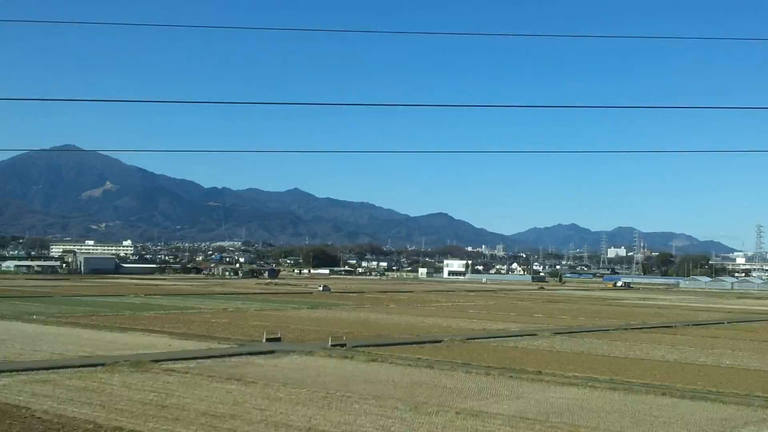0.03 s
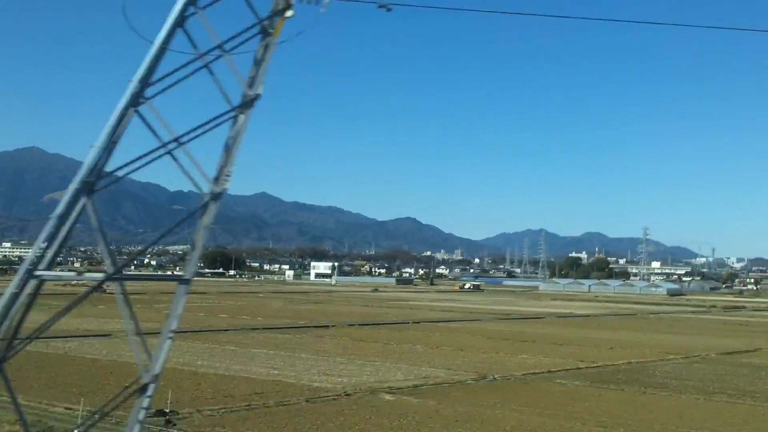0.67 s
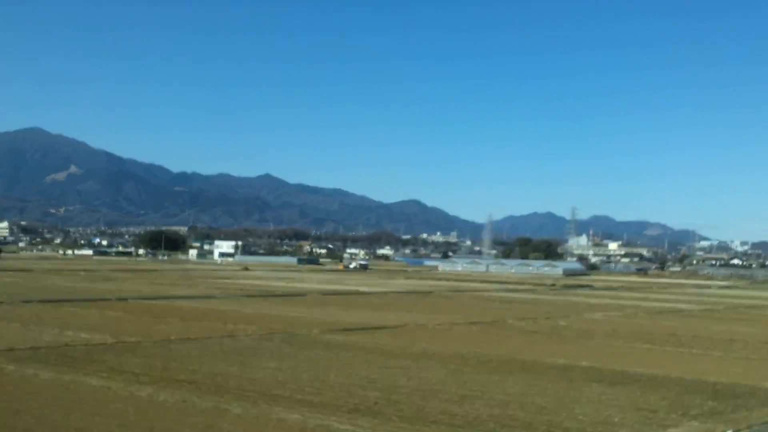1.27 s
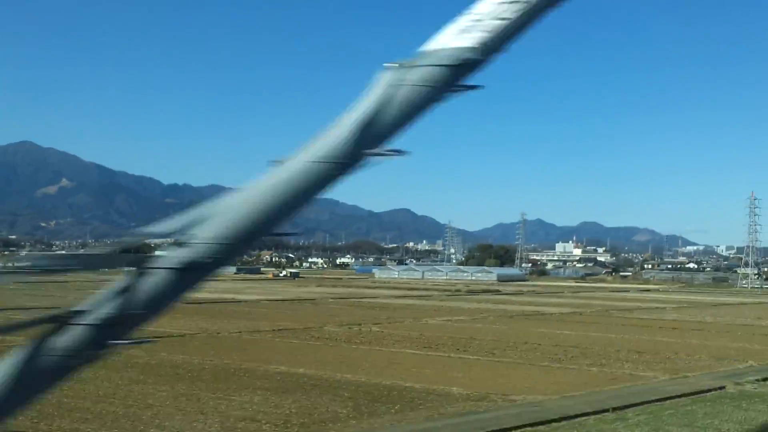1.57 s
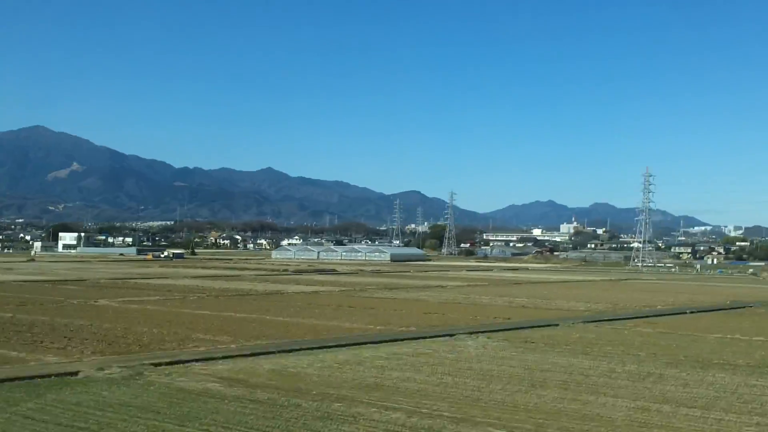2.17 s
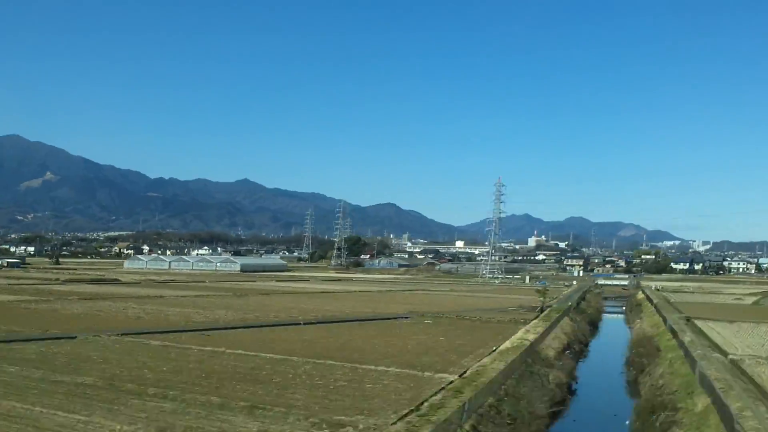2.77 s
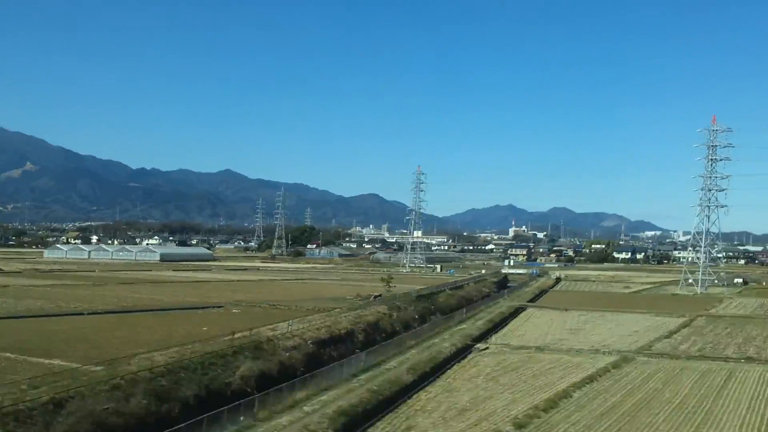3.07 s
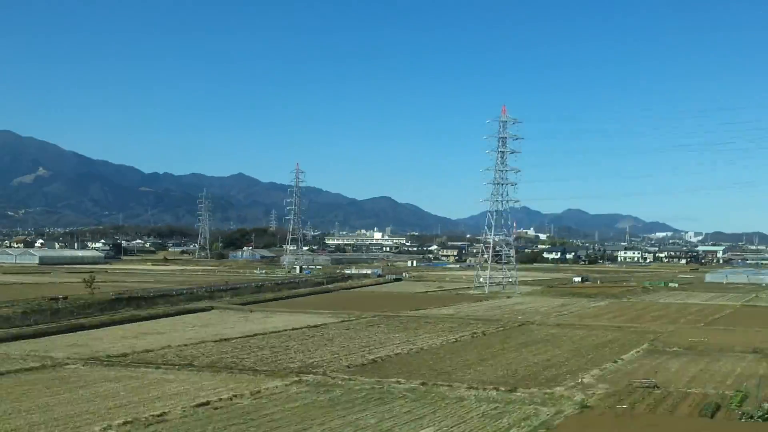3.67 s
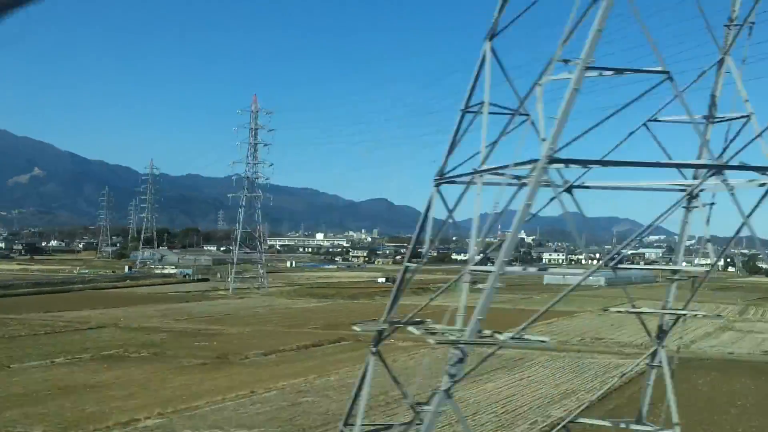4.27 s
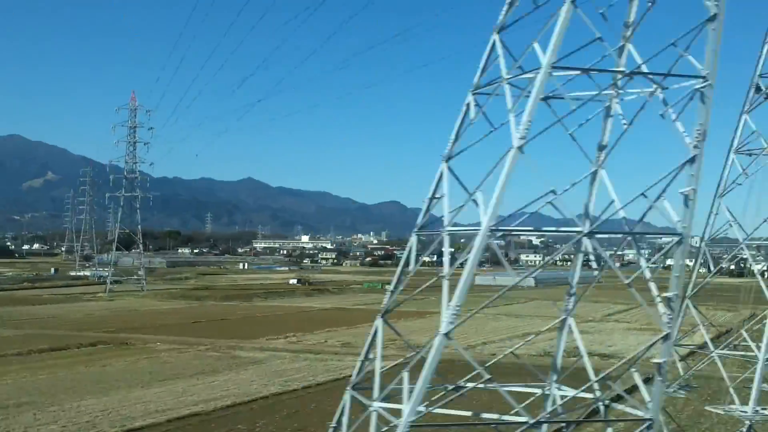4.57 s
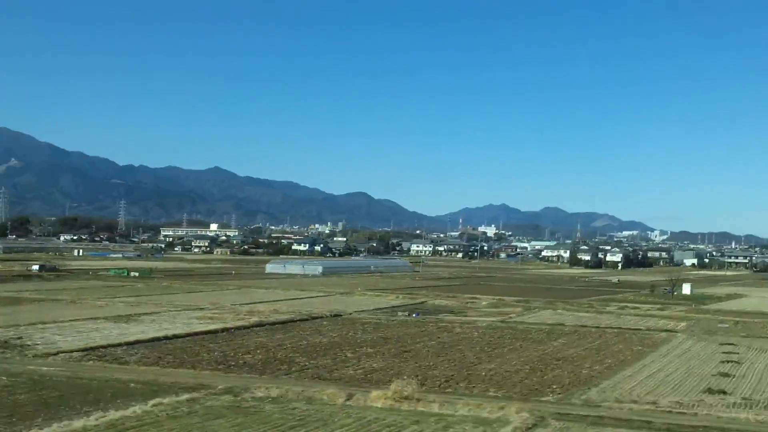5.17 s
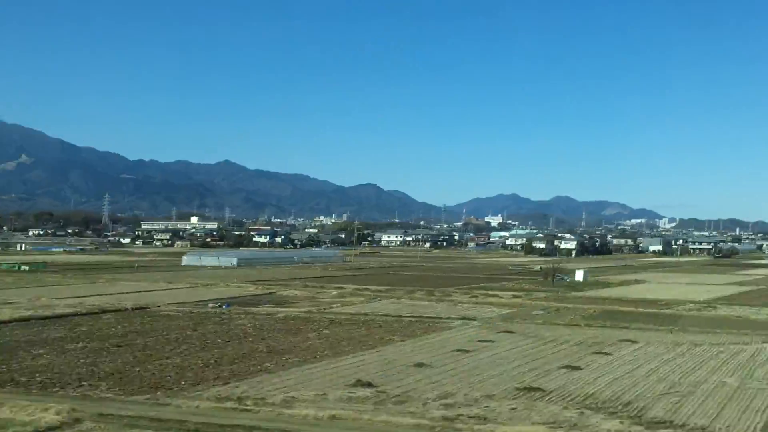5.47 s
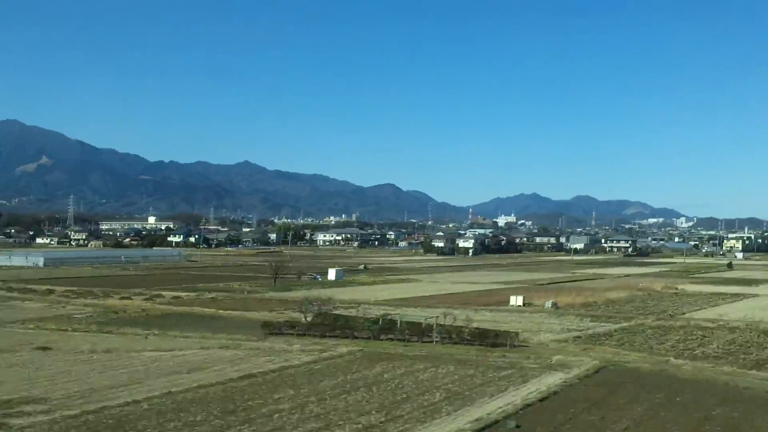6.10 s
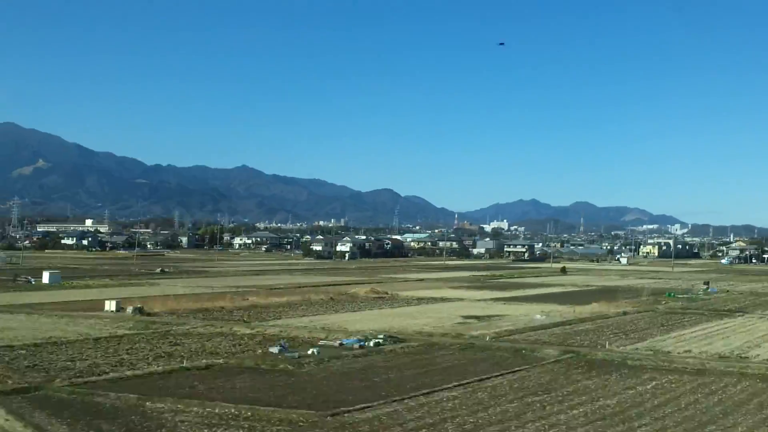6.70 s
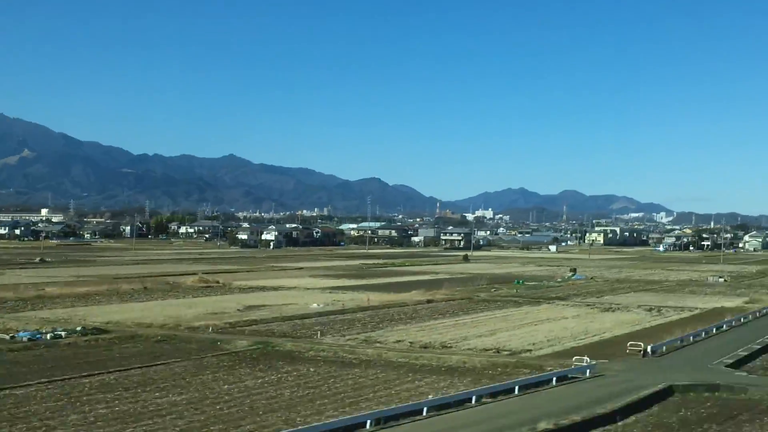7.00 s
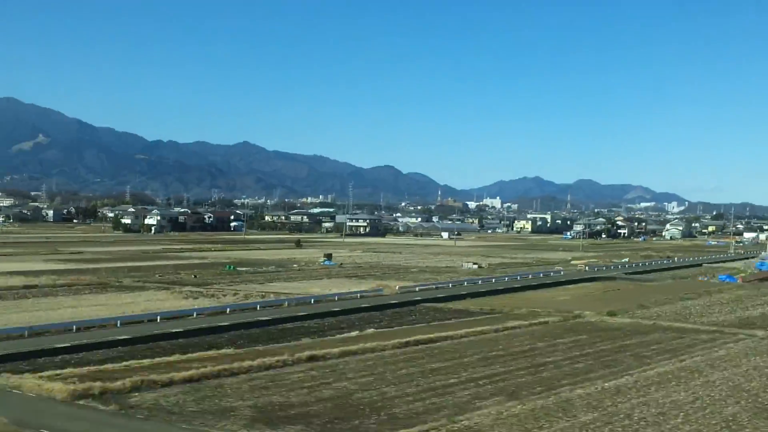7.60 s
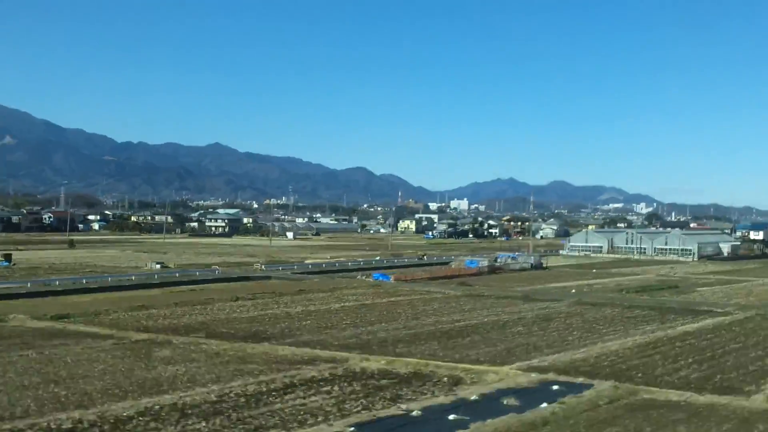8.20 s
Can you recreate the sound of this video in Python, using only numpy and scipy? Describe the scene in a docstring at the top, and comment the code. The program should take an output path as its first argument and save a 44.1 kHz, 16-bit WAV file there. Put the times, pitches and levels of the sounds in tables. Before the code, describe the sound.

A high-speed train cruises, heard from the cabin: deep droning rumble, faint rushing air and high metallic wheel ringing that swells and fades.

```python
"""High-speed train, window seat

At a steady cruise, rolling noise booms in the cabin's resonances and slightly out-of-round wheels
drone on multiples of their turn rate. Rough rail makes the wheels sing in swells, squeal and rasp.
Behind that the drive whines faintly, air rushes along the car and things by the track whoosh past."""
import sys
import numpy as np
from scipy import signal
from scipy.fft import rfft, irfft
from scipy.io import wavfile
from scipy.ndimage import uniform_filter1d, minimum_filter1d

SR = 44100
rng = np.random.default_rng(int(sys.argv[2]) if len(sys.argv) > 2 else 0)


def materialize(psi):
    """Save the field psi as 16-bit PCM at rate SR to the path in sys.argv[1].

    A 1-D psi becomes a single channel; in a 2-D psi each row is a channel.
    """
    bounded = np.clip(np.atleast_2d(psi).T, -1, 1)
    quanta = np.round(bounded * 32767).astype(np.int16)
    wavfile.write(sys.argv[1], SR, quanta)


N = 372640
TIME = np.arange(N) / SR
FREQ = np.maximum(np.arange(N // 2 + 1) * SR / N, 1)


def undb(db):
    """Decibels to gain."""
    return 10 ** (np.asarray(db) / 20)


def unit(x):
    """Scale to an rms of one."""
    return x / np.sqrt(np.mean(np.abs(x) ** 2))


def curve(table):
    """Glide through a table's points in time, one value per sample."""
    return np.interp(TIME, *np.transpose(table))


def across(table, hz):
    """Read a table on a log-frequency axis."""
    points, values = np.transpose(table)
    return np.interp(np.log(hz), np.log(points), values)


def swell(start, length, attack_s, release_s):
    """An envelope from 0 to 1: it rises at the start and falls back once its length is over."""
    rise = (TIME - start) / attack_s
    fall = 1 - (TIME - start - length) / release_s
    return np.clip(np.minimum(rise, fall), 0, 1)


def lifts(table, attack_s, release_s):
    """A level ride in dB, one swell per row."""
    return sum(db * swell(start, length, attack_s, release_s) for start, length, db in table)


def bursts(table, attack_s, release_s):
    """A gain that opens from silence, one swell per row."""
    return sum(undb(db) * swell(start, length, attack_s, release_s) for start, length, db in table)


def wander(rate_hz):
    """Smooth random motion, complex, with an rms of one."""
    lowpass = np.exp(-.5 * (FREQ / rate_hz) ** 2)
    real, imag = irfft(rfft(rng.standard_normal((2, N))) * lowpass, N)
    return unit(real + 1j * imag)


# Stereo balance. Each row: frequency in Hz, left minus right in dB.
BALANCE = [(60, 7), (190, 4), (330, 2), (700, 2), (1100, 0.5), (1600, 0.2), (2200, 5), (4500, 4.5),
           (6000, 4), (8000, 1.5), (10000, -7.5)]
def sides(hz):
    """Left and right gains: the window side, left, is louder in all but the highest treble."""
    return undb(np.array([[.5], [-.5]]) * across(BALANCE, hz))


# How alike the two sides sound. Each row: frequency in Hz, correlation.
LIKENESS = [(130, .985), (255, .98), (325, .66), (390, .88), (680, .76), (930, .5), (1100, .25),
            (1600, .55), (2100, .2), (3100, .2), (4100, .2), (5500, .08)]
# Treble arrives from one side and reaches the left later. Each row: frequency in Hz, lag in seconds.
LEFT_LAG = [(900, 0), (1300, .00036)]
def noise(colour, resonances=()):
    """Diffuse noise at unit rms, lifted at its resonances: narrow in the bass, wide in the treble."""
    octaves_outside = np.abs(np.log2(FREQ / np.clip(FREQ, colour[0][0], colour[-1][0])))
    db = across(colour, FREQ) - 20 * octaves_outside
    for hz, width, lift_db in resonances:
        db = db + lift_db / (1 + (2 * (FREQ - hz) / width) ** 2)
    alike = across(LIKENESS, FREQ)
    mid, side = rfft(rng.standard_normal((2, N))) * np.sqrt([1 + alike, 1 - alike])
    lag_rad = 0.19 + 2 * np.pi * FREQ * across(LEFT_LAG, FREQ)
    pair = np.array([(mid + side) * np.exp(-1j * lag_rad), mid - side])
    return unit(irfft(pair * sides(FREQ) * undb(db), N))


def tone(hz, unsteady, flutter_hz):
    """A tone whose level and phase flutter; high tones reach each side by different paths."""
    hz = hz * np.ones(N)
    alike = across(LIKENESS, hz.mean())
    per_side = np.array([wander(flutter_hz), wander(flutter_hz)])
    flutter = np.sqrt(alike) * wander(flutter_hz) + np.sqrt(1 - alike) * per_side
    amplitude = np.sqrt(1 - unsteady ** 2) + unsteady * flutter
    lag_rad = np.array([[0.36 + (1 - alike) * np.pi / 2], [0]])
    phase = 2 * np.pi * (np.cumsum(hz) / SR + rng.random()) - lag_rad
    return np.sqrt(2) * np.real(amplitude * np.exp(1j * phase)) * sides(hz.mean())


# Pitches of the fans and the drive, in Hz.
DRIVE_HZ = [71.5, 131, 2135, 2318, 2361.5, 7494]
# Their mix, pitch by pitch. Each row: opening level in dB, closing level in dB, unsteadiness 0-1.
DRIVE_MIX = [(-47.5, -50, 0.4), (-33, -41, 0.51), (-52.5, -50.5, 0.1), (-39.5, -54, 0.9),
             (-44.5, -42, 0.02), (-57.5, -52.5, 0.9)]
def drive():
    """Fans hum and the gears and motors whine at constant speed, slowly trading strength."""
    return sum(undb(np.linspace(start_db, end_db, N)) * tone(hz, unsteady, flutter_hz=4.5)
               for hz, (start_db, end_db, unsteady) in zip(DRIVE_HZ, DRIVE_MIX))


# The swish's narrow colour. Each row: frequency in Hz, relative level in dB.
SWISH_COLOUR = [(2200, -22), (2900, 4), (3200, -6), (4000, -25)]
def swish():
    """A brief thin hiss as the car passes a mast."""
    envelope = swell(start=4.25, length=0.08, attack_s=0.059, release_s=0.14)
    return noise(SWISH_COLOUR) * undb(-36) * envelope


# The whooshes' hollow colour. Each row: frequency in Hz, relative level in dB.
WHOOSH_COLOUR = [(350, -16), (500, -7), (680, 3), (850, -9), (1200, -22), (2000, -40)]
# Close pass-bys. Each row: start in seconds, length in seconds, level in dB.
WHOOSHES = [(2.5, 0.059, -24), (4.302, 0.073, -24), (4.697, 0.11, -28), (5.66, 0.13, -24),
            (5.98, 0.13, -23)]
def whooshes():
    """Things close to the track throw the train's roar back at the window."""
    return noise(WHOOSH_COLOUR) * bursts(WHOOSHES, attack_s=0.033, release_s=0.065)


# The body of the wind and its fine hiss. Each row: frequency in Hz, relative level in dB.
WIND_COLOUR = [(350, -7), (550, -1.5), (700, 2), (900, 2), (1100, 1.3), (1400, -3), (1750, -8.5),
               (2300, -19.5), (3500, -34.5)]
HISS_COLOUR = [(1500, -11), (3000, 4.5), (4500, 3), (5700, 0), (6200, 3), (6500, 5), (7500, 5), (8500, 1),
               (9300, -6), (10000, -21), (11000, -32.5)]
# Air rushes up at things by the track. Each row: start in seconds, length in seconds, lift in dB.
RUSHES = [(.04, 0.085, 2), (2.03, 0.11, 4), (4.69, 0.16, 3.5), (5.97, 0.14, 4)]
def air():
    """Wind on the skin of the car builds a little and rushes up now and then, over a flickering hiss."""
    wind_db = -24.5 + 0.24 * (TIME - TIME.mean())
    wind = noise(WIND_COLOUR) * undb(wind_db + lifts(RUSHES, attack_s=0.059, release_s=0.14))
    hiss = noise(HISS_COLOUR) * undb(-39 + 0.82 * wander(6.9).real)
    return wind + hiss


# Rail roughness, as the rolling noise it excites. Each row: time in seconds, level in dB.
RAIL = [(0.1, -33), (0.52, -31), (0.68, -34), (0.97, -29.5), (1.1, -32.5), (1.45, -28.5), (1.75, -30),
        (2.0, -29), (2.47, -30), (2.6, -30), (3.05, -31.5), (3.24, -29), (3.43, -31), (3.51, -29.5),
        (4.02, -31.5), (4.42, -30), (4.57, -32.5), (4.8, -30), (5.05, -32.5), (5.5, -29), (5.78, -29),
        (5.83, -30), (5.97, -29.5), (6.05, -29.5), (6.28, -29.5), (6.42, -34.5), (6.56, -29.5), (7.13, -31),
        (7.26, -32.5), (7.55, -29.5), (8.07, -28), (8.38, -30.5)]
def roughness(slope):
    """Lift in dB for a layer that gains `slope` dB for each dB the rail is rougher than usual."""
    usual_db = -31
    return slope * (curve(RAIL) - usual_db)


# Rolling noise and its upper sheen. Each row: frequency in Hz, relative level in dB.
ROLLING_COLOUR = [(1300, -29), (1750, -9.5), (1950, -1.5), (2100, -1.5), (2280, -0.5), (2450, -2),
                  (2650, -4), (2900, -7.5), (3400, -13.5), (4500, -33)]
SHEEN_COLOUR = [(2700, -18.5), (3400, -5), (3800, 0), (4400, -1), (4900, -3), (5500, -10), (7000, -24.5)]
# Wheel resonances in both. Each row: frequency in Hz, width in Hz, lift in dB.
WHEEL_RESONANCES = [(2148, 66, 5.5), (2296, 19, 7.5), (4340, 45, 1.5)]
# Scrapes that bring up the sheen. Each row: start in seconds, length in seconds, lift in dB.
SCRAPES = [(1.8, 0.67, 1.5), (3.12, 0.4, 3.5), (6.25, .35, 2.5), (7.9, .2, 0.5)]
def rolling():
    """Steel on steel: wheels and rail radiate noise that follows the roughness and brightens in scrapes."""
    body = noise(ROLLING_COLOUR, WHEEL_RESONANCES) * undb(-30 + roughness(slope=1.1))
    sheen_db = -39.5 + roughness(slope=0.46) + lifts(SCRAPES, attack_s=0.092, release_s=0.092)
    return body + noise(SHEEN_COLOUR, WHEEL_RESONANCES) * undb(sheen_db)


# The wheels rasp on the rail. Each row: start in seconds, length in seconds, level in dB.
RASPS = [(1.538, 0.16, -26), (2.017, 0.037, -26), (2.527, 0.12, -30), (4.33, 0.038, -32),
         (5.995, 0.083, -26.5), (6.526, 0.16, -34)]
# Wheel modes that a rasp excites. Each row: frequency in Hz, width in Hz, lift in dB.
RASP_MODES = [(1870, 25, 8), (2040, 30, 12), (2216, 50, 11), (2260, 23, 13), (2630, 90, -1)]
def rasps():
    """Short spells of sliding contact chatter on the wheel modes."""
    sliding = bursts(RASPS, attack_s=0.03, release_s=0.035)
    chatter = unit(undb(2.5 * wander(rate_hz=45).real))
    return noise(ROLLING_COLOUR, RASP_MODES) * sliding * chatter


# The main wheel mode drifts as the contact crosses the tread. Each row: time in seconds, pitch in Hz.
RING_PITCH = [(0, 2167), (.55, 2163), (.85, 2174), (1.7, 2158), (2.0, 2172), (2.3, 2177), (2.6, 2190),
              (2.95, 2186), (3.25, 2167), (3.55, 2173), (4.05, 2183), (4.45, 2178), (4.75, 2174),
              (5.4, 2180), (5.8, 2187), (6.05, 2176), (6.4, 2168), (7.1, 2158), (7.7, 2166), (8.1, 2165)]
# Pitches of the modes that sing together, as ratios to the main one.
MODE_RATIOS = [1, .876, .936, 1.159, 5]
# Their mix, mode by mode. Each row: relative level in dB, unsteadiness 0-1.
MODE_MIX = [(2, 0.24), (-16, 0.8), (-9, 0.9), (-14.5, 1), (-38.5, .5)]
# The modes sing out. Each row: start in seconds, length in seconds, lift in dB.
SONGS = [(.3, 0.21, 4), (.88, 0.11, 3.5), (1.92, 0.33, 7), (2.55, 0.06, 6.5), (3.12, 0.31, 5),
         (3.49, 0.2, 8), (3.78, 0.35, 7), (4.19, 0.036, 8), (4.32, 0.34, 4.5), (4.66, 0.31, 8.5),
         (5.22, 0.14, 7), (5.41, 0.17, 5.5), (5.63, 0.16, 7.5), (6.02, 0.32, 3), (6.96, 0.22, 6),
         (7.42, 0.51, 3.5), (7.96, 0.18, 6)]
# The octave squeals. Each row: start in seconds, length in seconds, lift in dB.
SQUEALS = [(.15, 0.18, 6), (1.1, 0.33, 3.5), (1.75, 0.16, 10.5), (2.05, .3, 4), (2.52, .08, 6),
           (3.13, 0.41, 6.5), (3.85, 0.28, 1), (6.23, 0.16, 8), (6.47, 0.09, 8), (6.84, 0.054, 6.5),
           (8.0, 0.38, 6)]
def wheel_song():
    """Rough rail rings the wheel modes; harder contact makes the main mode's octave squeal."""
    hz = curve(RING_PITCH)
    ring_db = -41 + roughness(slope=2.1) + lifts(SONGS, attack_s=0.0098, release_s=0.028)
    ring = sum(undb(ring_db + mode_db) * tone(ratio * hz, unsteady, flutter_hz=10)
               for ratio, (mode_db, unsteady) in zip(MODE_RATIOS, MODE_MIX))
    squeal_db = -49 + lifts(SQUEALS, attack_s=0.043, release_s=0.056)
    return ring + undb(squeal_db) * tone(2 * hz, unsteady=0.51, flutter_hz=20)


# The companion mode sings out. Each row: start in seconds, length in seconds, lift in dB.
COMPANION_SONGS = [(1.54, .14, 8), (1.92, 0.14, 8), (3.14, 0.19, 8), (3.48, 0.15, 7), (4.72, 0.14, 7),
                   (6.48, 0.29, 3), (7.95, .2, 3)]
def companion_mode():
    """A wheel mode just above the main one follows the rail, joins in spells and beats against it."""
    db = -44 + roughness(slope=1.5) + lifts(COMPANION_SONGS, attack_s=0.0098, release_s=0.056)
    return undb(db) * tone(hz=2285, unsteady=0.45, flutter_hz=17)


# The drone's quiet bed. Each row: multiple of the turn rate, level in dB, unsteadiness 0-1.
QUIET_HUMS = [(3, -42.5, 0), (10, -30.5, 0.83), (12, -40, 0.3)]
# Level rides for the main hum and the one below it. Each row: time in seconds, level in dB.
MAIN_HUM = [(0, -24.5), (.13, -13.5), (.43, -24), (.75, -14.5), (.86, -22), (1.0, -14.5), (1.29, -22),
            (1.47, -17.5), (1.65, -18), (1.97, -13.5), (2.22, -20.5), (2.42, -17), (2.6, -26), (2.82, -27),
            (2.98, -12), (3.16, -22.5), (3.35, -14), (3.75, -21), (3.95, -18), (4.5, -17), (4.9, -16),
            (5.18, -22), (5.3, -17), (5.65, -14.5), (5.87, -27.5), (6.17, -12), (6.4, -19), (6.55, -13.5),
            (6.7, -20.5), (6.93, -14), (7.22, -13.5), (7.36, -25), (7.52, -19), (7.7, -14.5), (7.95, -21),
            (8.33, -14)]
LOW_HUM = [(0, -19), (.4, -31), (.66, -14), (.95, -28), (1.6, -22), (2.33, -32), (2.66, -16.5), (2.85, -26),
           (3.12, -18.5), (3.5, -22.5), (4.4, -35), (4.85, -20), (5.35, -27), (5.97, -19.5), (6.25, -30),
           (6.38, -19), (6.66, -22), (6.9, -33), (7.25, -19.5), (7.5, -24.5), (7.8, -20), (8.4, -23)]
def wheel_drone():
    """Lobes on the wheel treads hum on multiples of the turn rate; the two strongest swell and fade."""
    main_lobes, low_lobes = 9, 6
    turn_hz = 27.14 * (1 + 0.0014 * wander(1.0).real)
    bed = sum(undb(db) * tone(lobes * turn_hz, unsteady, flutter_hz=4.4)
              for lobes, db, unsteady in QUIET_HUMS)
    main = undb(curve(MAIN_HUM)) * tone(main_lobes * turn_hz, unsteady=0.12, flutter_hz=4.8)
    low = undb(curve(LOW_HUM)) * tone(low_lobes * turn_hz, unsteady=0.42, flutter_hz=4.8)
    return main + low + bed


# The dark colour of the floor rumble. Each row: frequency in Hz, relative level in dB.
RUMBLE_COLOUR = [(20, -45), (36, -36), (60, -22), (88, -21.5), (150, -4), (220, -3.5), (262, -10),
                 (312, -12), (375, -8), (450, -12.5), (660, -15.5), (850, -21.5), (1200, -37.5),
                 (2000, -49)]
# Cabin resonances. Each row: frequency in Hz, width in Hz, lift in dB.
CABIN_RESONANCES = [(104, 12, 5), (137, 10, 0.5), (162.5, 16, 5.5), (191, 4.1, 1.5), (217, 22.5, 7.5),
                    (243.5, 18, 1.5), (284, 9, 2), (302, 20, 3), (351, 14, 1.5), (374, 17, 1),
                    (464, 14, 1.5), (495, 4.8, 5.5), (553, 44, 2), (629.6, 20, 7), (693, 8, 4.5)]
# The bass booms on uneven track and eases on smooth track.
# Each row: start in seconds, length in seconds, lift or dip in dB.
BOOMS = [(.58, 0.23, 1), (1.88, 0.16, -2.5), (2.58, 0.064, 0.5), (2.84, 0.23, 4.5), (3.16, 0.3, -3.5),
         (5.93, 0.069, 5.5), (6.8, .1, -3), (7.27, 0.079, -7), (7.83, 0.11, -5), (8.2, 0.2, 2)]
def rumble():
    """Track roughness shakes the floor and booms in the cabin."""
    level_db, bass_top_hz = -13, 260
    floor = noise(RUMBLE_COLOUR, CABIN_RESONANCES) * undb(level_db)
    bass = irfft(rfft(floor) / (1 + (FREQ / bass_top_hz) ** 10), N)
    boom_gain = undb(lifts(BOOMS, attack_s=0.032, release_s=0.042))
    return floor + bass * (boom_gain - 1)


def scene():
    """Everything that reaches the seat, in stereo."""
    low_end = rumble() + wheel_drone()
    steel = rolling() + wheel_song() + companion_mode() + rasps()
    background = drive() + air() + whooshes() + swish()
    return low_end + steel + background


def record(dry):
    """A limiter eases both sides down around peaks over full scale; a steep low-pass cuts the top."""
    window, top_hz = SR // 100, 10944
    allowed_gain = 1 / np.maximum(np.abs(dry).max(axis=0), 1)
    gain = uniform_filter1d(minimum_filter1d(allowed_gain, size=window), size=window)
    lowpass = signal.ellip(8, .2, 70, top_hz, fs=SR, output="sos")
    return signal.sosfilt(lowpass, dry * gain)


dry = scene()
out = record(dry)
materialize(out)
```